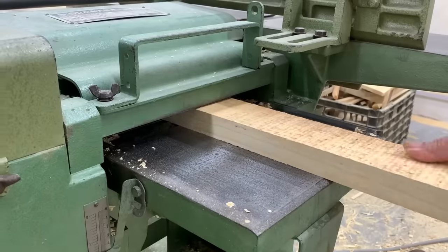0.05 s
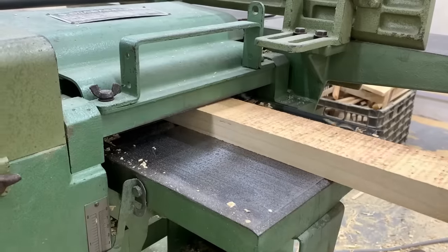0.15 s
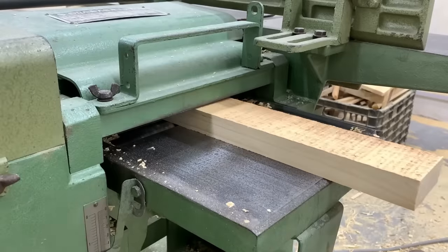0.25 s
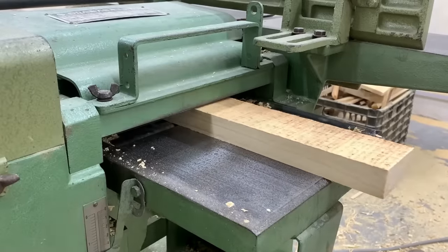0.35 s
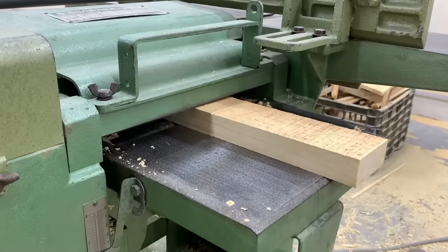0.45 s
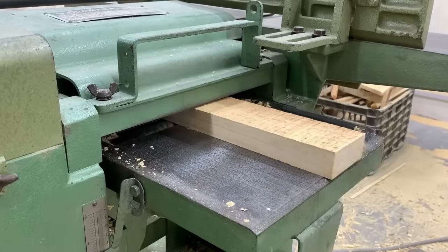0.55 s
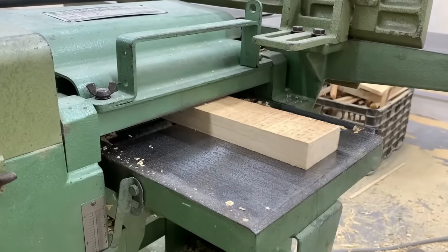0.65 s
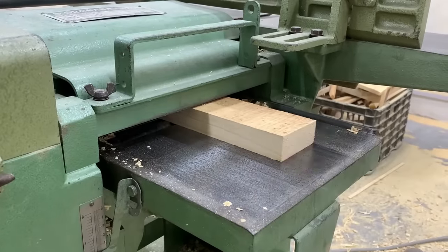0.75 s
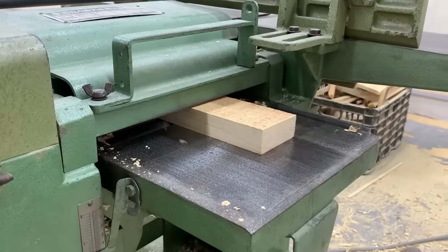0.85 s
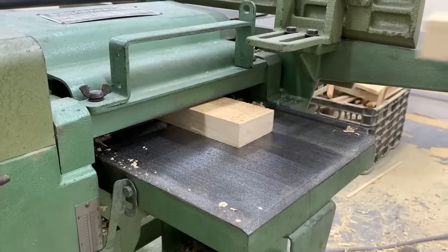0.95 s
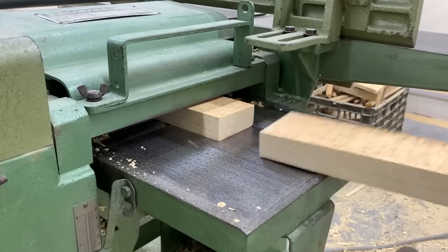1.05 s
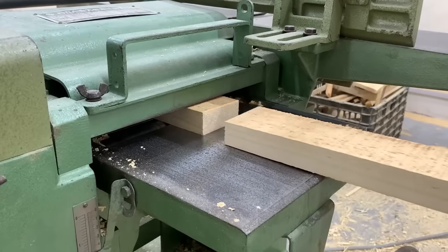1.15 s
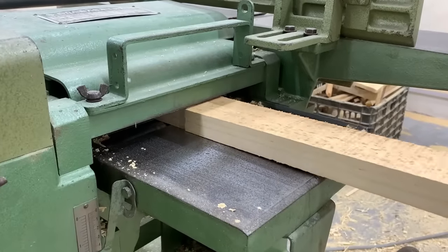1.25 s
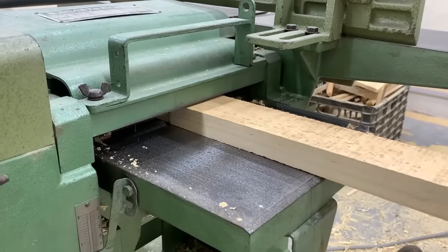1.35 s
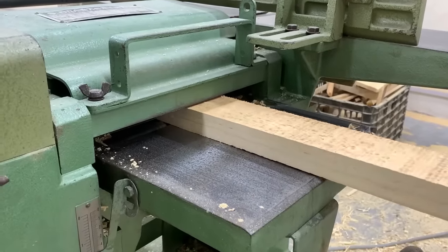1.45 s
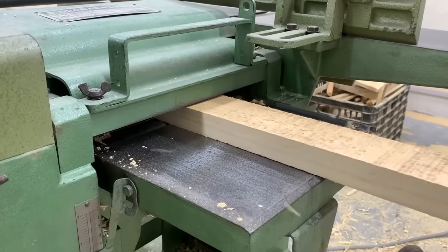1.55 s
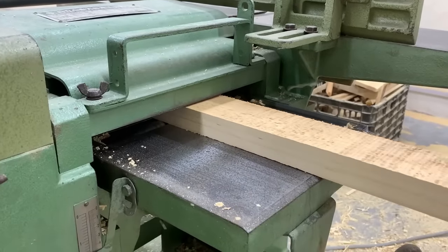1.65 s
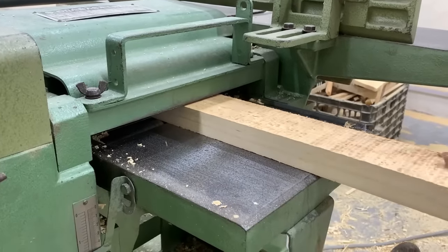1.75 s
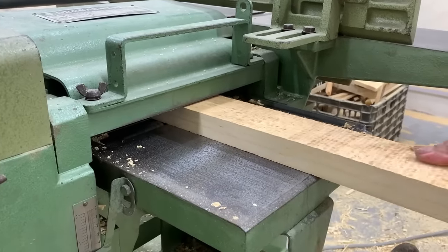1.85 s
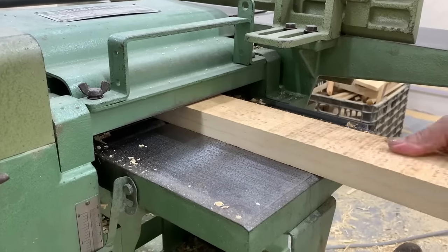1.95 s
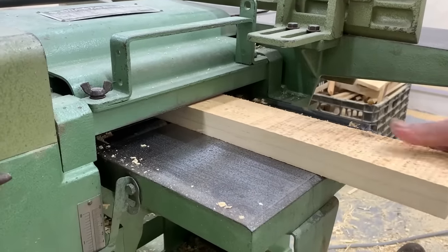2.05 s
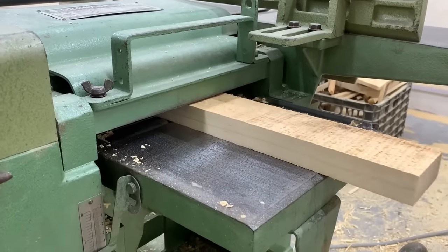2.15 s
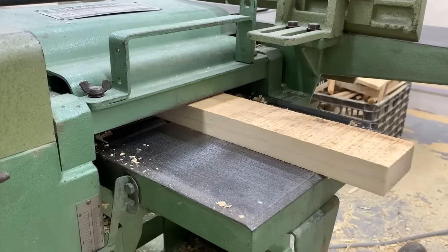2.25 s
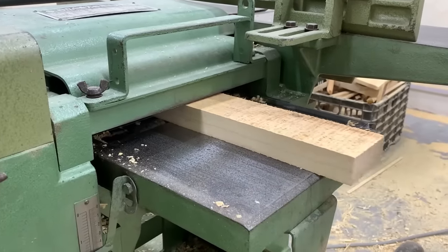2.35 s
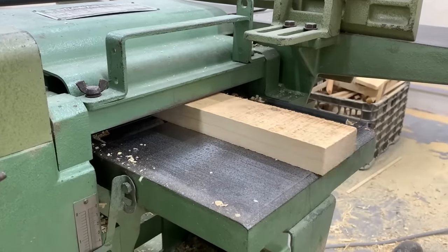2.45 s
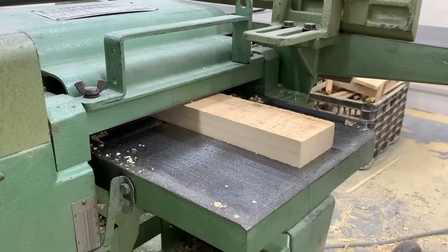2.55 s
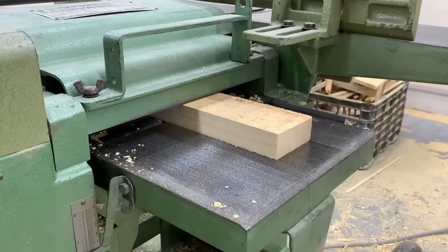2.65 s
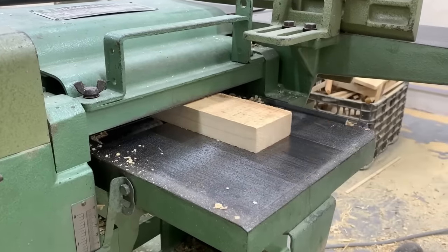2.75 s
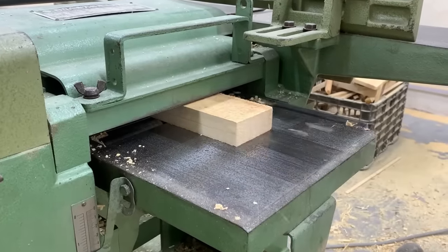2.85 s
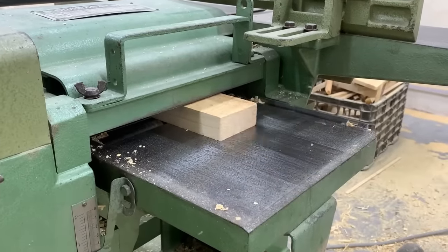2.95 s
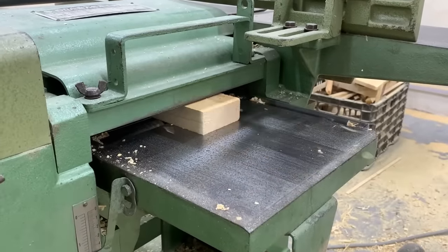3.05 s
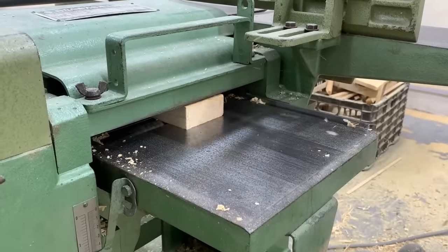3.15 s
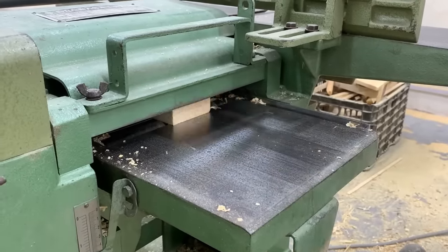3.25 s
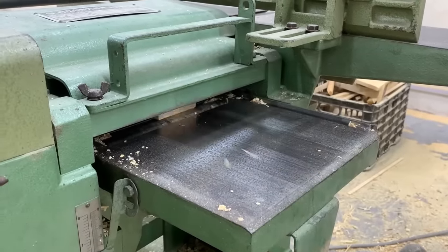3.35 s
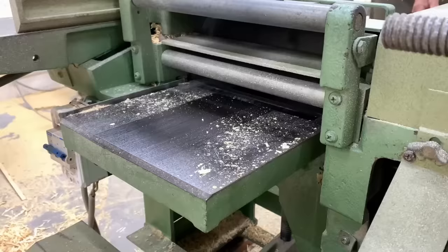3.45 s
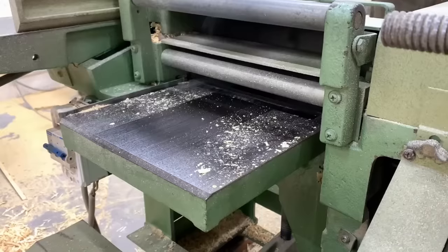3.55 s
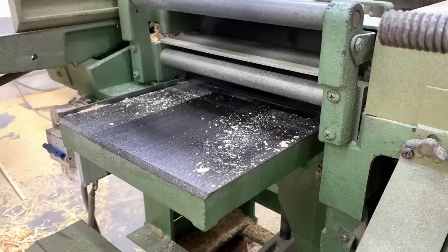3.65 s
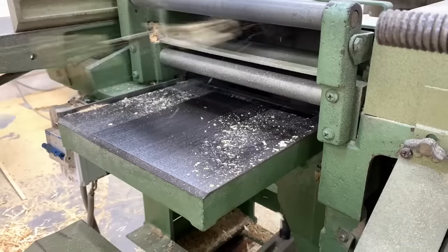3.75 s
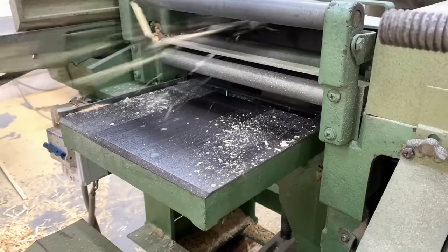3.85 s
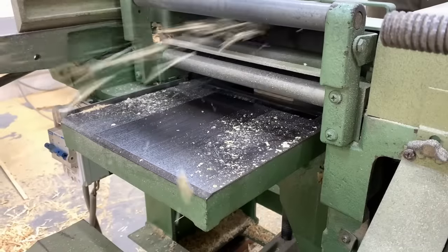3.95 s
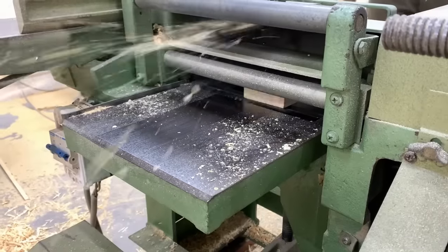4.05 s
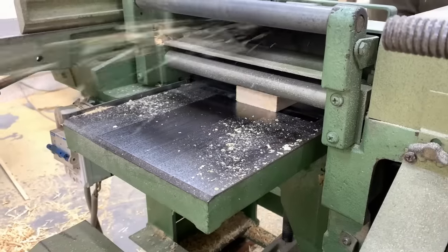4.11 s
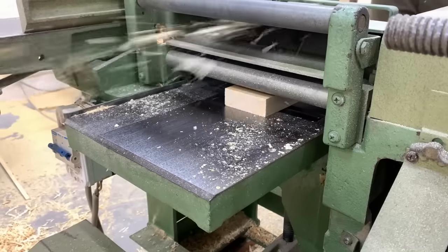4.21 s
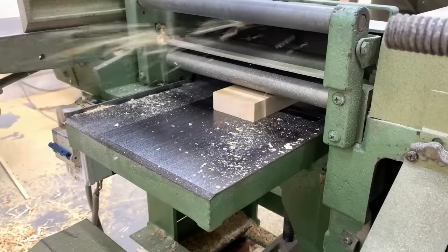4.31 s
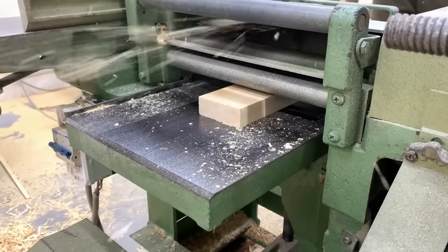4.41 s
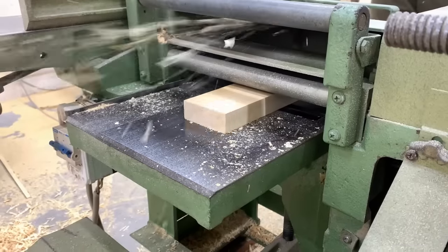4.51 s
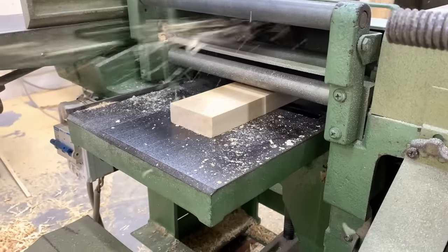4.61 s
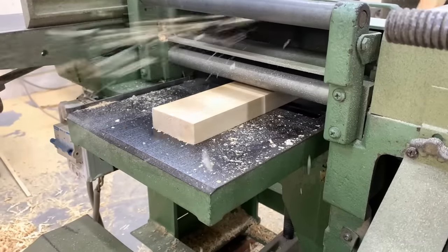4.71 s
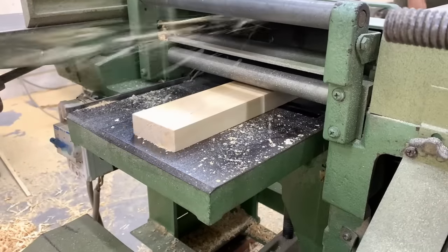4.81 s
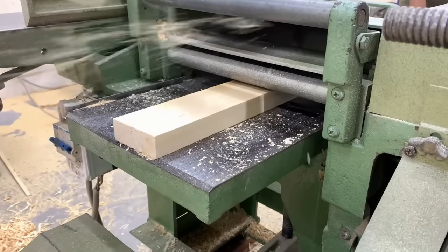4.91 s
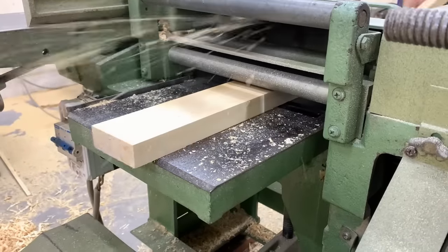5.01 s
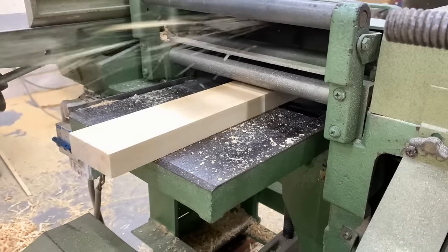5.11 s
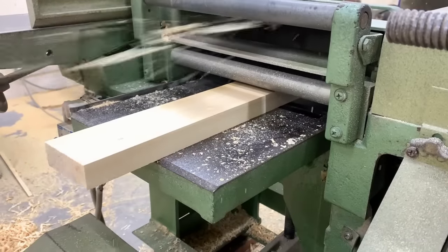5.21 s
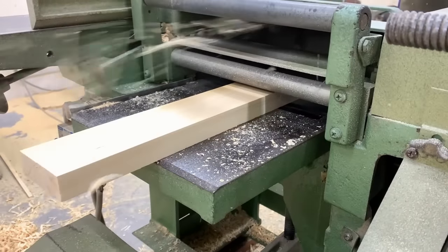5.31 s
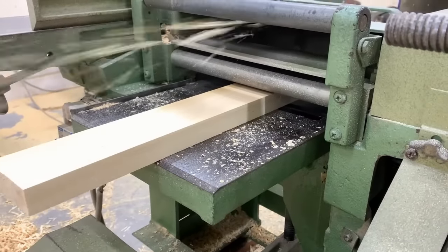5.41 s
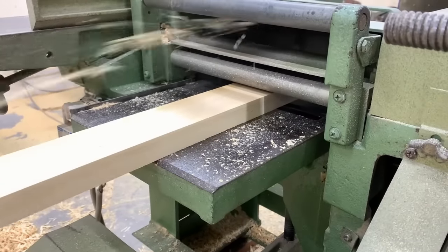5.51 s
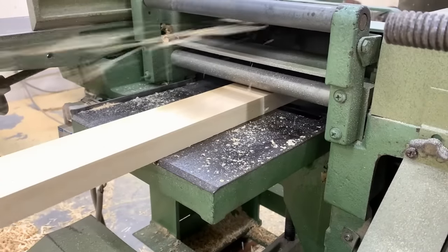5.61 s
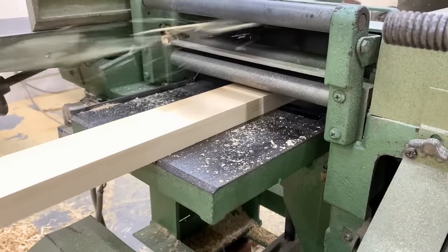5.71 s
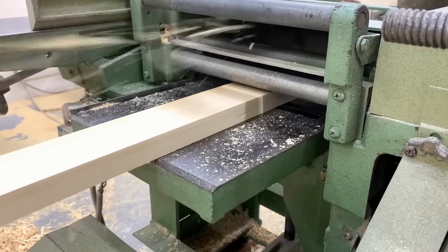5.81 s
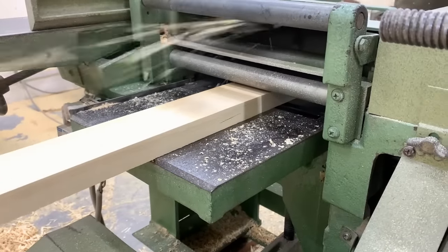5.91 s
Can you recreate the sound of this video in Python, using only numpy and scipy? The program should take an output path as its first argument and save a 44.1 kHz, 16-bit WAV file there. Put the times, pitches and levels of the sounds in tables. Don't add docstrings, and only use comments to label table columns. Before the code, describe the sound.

A thickness planer is already cutting at 0 s, heard close in stereo in a workshop: a steady buzzing howl around 256 Hz with a tall stack of piercing overtones, gear and roller whine, roaring air and torn-wood hiss. Squeals flicker at the start, and a ringing tone slides upward from 0.5 to 0.9 s. A sharp wooden knock lands at 0.7 s, clacks at about 1.2 s as another board comes in, then a bright squeal near 1.8-2.0 s and a duller knock at 2.4 s. Faint taps and a strong squeal come around 3.4-3.57 s. At 3.58 s a tiny gap switches to the outfeed: the machine runs free, slightly higher, airier and whinier. At 3.9 s the knives bite, pitch sags, and harsh ringing and rattling return. Flying chips make thin metallic pings, mainly 4.7-5.3 s. The cut continues until the abrupt end near 6 s.

```python
import sys
import numpy as np
from scipy import signal
from scipy.fft import rfft, irfft, next_fast_len
from scipy.io import wavfile
from scipy.ndimage import uniform_filter1d, map_coordinates

SR = 44100
rng = np.random.default_rng(int(sys.argv[2]) if len(sys.argv) > 2 else 0)


def undo_db(level):
    steps = np.asarray(level, float) / 20
    return 10 ** steps


def output_pcm(signal):
    pcm = np.clip(np.atleast_2d(signal).T, -1, 1) * 32767
    wavfile.write(sys.argv[1], SR, np.round(pcm).astype(np.int16))


N = 263277
T = np.arange(N) / SR
SLOW = T[::128]
CHANGE_START_S, CHANGE_END_S = 3.5748, 3.5915
AT_INFEED = T < (CHANGE_START_S + CHANGE_END_S) / 2
CUT_STARTS_S = 3.91
SQUEAL_PEAK_DB = 4


def unit(x):
    return x / np.sqrt(np.mean(np.abs(x) ** 2) + 1e-20)


def along(points, hz):
    f, v = np.transpose(points)
    return np.interp(np.log(hz + 1), np.log(f + 1), v)


def curves(rows, t):
    s, *cols = np.transpose(rows)
    return [np.interp(t, s, c) for c in cols]


def wobble(rate_hz, t):
    return map_coordinates(rng.standard_normal(400), [t * np.clip(rate_hz, 0, 60)])


def filtered(x, response):
    m = next_fast_len(N + 8192)
    gain = response(np.fft.rfftfreq(m, 1 / SR))
    return irfft(rfft(x, m) * gain, m)[..., :N]


def swell(start_s, end_s):
    outside_s = np.maximum(start_s + .06 - SLOW, SLOW - end_s + .04)
    return -30 * np.clip(outside_s / .13, 0, 1) * ((SLOW > .06) | (start_s > 0))


def place(infeed, idle, cutting):
    entering = np.clip((SLOW - CUT_STARTS_S) / 0.025 + .5, 0, 1)
    return np.where(SLOW < (CHANGE_START_S + CHANGE_END_S) / 2, infeed, idle + (cutting - idle) * entering)


def partial(turns, db, pan_db, lead_rad, fuzz, fuzz_rate):
    blur = 1 + fuzz * (wobble(fuzz_rate, SLOW) + 1j * wobble(fuzz_rate, SLOW))
    blur = blur / np.sqrt(1 + 2 * fuzz ** 2)
    ears = [blur * undo_db(ear * pan_db / 2) * np.exp(ear * 1j * lead_rad) for ear in (1, -1)]
    size = np.sqrt(2) * undo_db(db) * np.array(ears)
    size = np.repeat(size.astype(np.complex64), 128, axis=1)[:, :N]
    phase = (2 * np.pi * (turns % 1)).astype(np.float32)
    return size.real * np.cos(phase) - size.imag * np.sin(phase)


# multiple of knife rate, start in s, end in s, gain in dB.
SHIFTS = [(8, 1.35, 1.85, 5), (8, 3.0, 3.58, 4), (4, 1.3, 2.2, -3), (4.418, 2.6, 3.35, -5),
          (5, 5.35, 5.9, -6), (5.418, 5.7, 5.9, 5), (6, 2.4, 3.0, 4), (6, 3.4, 3.55, -10),
          (6.418, 4.45, 5.8, -10), (7, 0.3, 1.05, -3), (7, 1.75, 2.15, 4), (7.418, 3.05, 3.25, 5),
          (7.418, 4.9, 5.5, -6), (8, 0.05, 0.2, 7), (8, 0.4, 1.45, -3), (8, 3.9, 4.2, 4),
          (8, 5.4, 5.75, 5), (8.418, 0.0, 1.95, -4), (8.418, 2.6, 3.5, -4), (8.418, 4.65, 4.95, 4),
          (9, 0.25, 1.45, -9), (9.418, 3.95, 4.25, -10), (11, 2.25, 3.6, -3), (11, 4.65, 5.25, -5),
          (12, 1.4, 1.9, 7),
          (13, 2.1, 3.45, -5), (14, 0.0, 1.65, -6), (14, 2.55, 3.6, -4), (14, 3.85, 4.05, 10),
               (14, 4.8, 5.3, 6), (15, 1.4, 3.35, -3), (15, 5.05, 5.95, -4), (16, 1.1, 3.5, -4),
               (16, 4.1, 5.9, -5), (17, 0.0, 0.15, -4), (17, 0.95, 1.85, -7), (17, 3.55, 4.3, -6),
               (17, 5.05, 5.4, -6), (18, 1.35, 1.8, -5), (18, 3.6, 4.35, -5), (19, 1.15, 3.55, -4),
               (19, 4.6, 5.2, 8), (20, 0.0, 1.8, -3), (20, 1.9, 3.55, -5), (20, 4.3, 5.95, -5),
               (21, 0.0, 1.95, -4), (21, 2.1, 3.45, -8), (21, 3.55, 5.95, -6), (22, 3.55, 5.95, -4),
               (23, 0.85, 3.25, -4), (23, 3.85, 5.95, -4), (24, 2.75, 3.5, -10), (25, 4.3, 5.95, -6),
               (26, 5.6, 5.9, -10), (27, 0.35, 0.55, -9), (27, 0.9, 1.8, -4), (27, 4.8, 5.4, -7),
               (28, 0.4, 0.55, -10), (28, 3.7, 5.35, -5), (29, 0.4, 1.45, -3), (30, 0.5, 0.9, -9),
               (31, 0.3, 2.1, -4), (32, 0.5, 0.85, -6), (33, 0.8, 1.7, -5), (34, 3.6, 4.35, -3),
               (35, 0.2, 0.95, -4), (36, 2.4, 3.0, 10), (36, 3.55, 5.8, -5), (37, 0.2, 0.55, -10),
          (12, 1.65, 1.8, 8), (12, 3.25, 3.55, 9), (12, 3.8, 3.95, 9), (13, 2.7, 2.9, 7),
                (14, 4.7, 5.15, -4), (15, 0.2, 0.65, 6), (15, 2.55, 3.1, -4), (17, 0.15, 0.65, -6),
                (17, 2.9, 3.45, -4), (18, 4.85, 5.0, 8), (19, 4.75, 4.9, 9), (20, 1.7, 1.85, -7),
                (21, 0.95, 1.5, -8), (22, 3.55, 3.9, -9), (23, 0.55, 0.8, -8), (23, 3.3, 3.55, -9),
                (23, 4.2, 4.75, -5), (24, 1.95, 2.15, 7), (24, 3.95, 4.5, -9), (25, 0.0, 0.25, -7),
                (26, 1.95, 2.2, 9), (26, 5.35, 5.55, 6), (27, 0.65, 0.9, 5), (29, 5.05, 5.3, 7),
                (30, 4.4, 4.7, 5), (30, 4.95, 5.5, 6), (32, 4.5, 4.95, 5), (34, 4.35, 4.65, 5),
                (36, 1.9, 2.45, 9), (36, 2.5, 3.05, 7), (40, 3.1, 3.5, 8), (43, 5.7, 5.9, 9)]


def shift(k):
    total_db = 0
    for tone, start, end, db in SHIFTS:
        if tone == k:
            total_db = total_db + db * np.clip(1 + swell(start, end) / 30, 0, 1)
    return 0.8 * total_db


def tones(table, turns, fuzz, fuzz_rate):
    out = np.zeros((2, N))
    for k, infeed, idle, cutting, pan_in, pan_out in table:
        db = place(infeed, idle, cutting) + shift(k) + 0.5
        pan_db = place(pan_in, pan_out, pan_out)
        out += partial(k * turns + rng.random(), db, pan_db, rng.normal(-0.19, 0.13), fuzz, fuzz_rate)
    return out


# time in s, knife passes per s.
SPEED = [(0.0, 256.5), (0.55, 256.85), (1.22, 257.7), (1.62, 257.35), (1.9, 256.75), (2.15, 256.95),
         (2.65, 256.9), (3.2, 256.0), (3.4, 255.95), (3.58, 256.2), (3.59, 259.4), (3.86, 259.4),
         (3.95, 256.1), (4.05, 255.8), (4.4, 255.5), (4.8, 255.45), (5.05, 255.72), (5.97, 255.75)]


def knife_turns():
    return np.cumsum(curves(SPEED, T)[0]) / SR


# frequency in Hz, infeed dB, outfeed idle dB, outfeed cutting dB.
GRAIN = [(3540, -35.5, -46, -29), (4500, -33.5, -49, -36), (6200, -48.5, -49, -46), (7900, -50, -45, -34.5),
         (10000, -49, -54, -53), (10600, -33.5, -50, -42), (13500, -48, -52, -36)]
# start in s, end in s, centre from Hz, to Hz, level in dB.
CHATTER = [(0, .1, 4900, 4600, -25), (.2, .5, 6580, 7600, -32.5), (.6, 1.0, 5860, 6900, -29.5),
           (1.02, 1.4, 7360, 6400, -36), (1.6, 1.75, 6200, 5700, -38), (1.82, 1.98, 5300, 3700, -25),
           (3.0, 3.3, 4100, 4500, -34), (3.08, 3.3, 9000, 11700, -37), (3.38, 3.58, 4350, 4500, -32.5),
           (3.92, 4.45, 4500, 4500, -32), (5.7, 5.9, 4930, 6800, -33.5)]
# start in s, end in s, centre from Hz, to Hz, level in dB.
FREE_END = [
    (.52, .9, 7100, 9100, -29),
    (.9, 1.12, 9300, 8530, -38),
    (3.9, 4.17, 8950, 8600, -30.5),
]


def bite(hz):
    grip_s, let_go_s = 0.04, 0.072
    f, *levels = np.transpose(GRAIN)
    power = undo_db(2 * place(*[np.interp(hz, f, level) for level in levels]))
    for rows, width_octaves in [(CHATTER, 0.43), (FREE_END, 0.13)]:
        for start, end, from_hz, to_hz, db in rows:
            edge = np.maximum(np.maximum((start - SLOW) / grip_s, (SLOW - end) / let_go_s), 0)
            centre_hz = np.interp(SLOW, [start, end], [from_hz, to_hz])
            off = np.log2(hz / centre_hz) / width_octaves
            power = power + undo_db(2 * (db - 20 * edge)) * np.exp(-off ** 2)
    return 10 * np.log10(power)


BITE_HZ = [4530, 6100, 9000]


def whole_bite():
    power = sum(undo_db(2 * bite(hz)) for hz in BITE_HZ)
    return np.interp(T, SLOW, 10 * np.log10(power))


# frequency in Hz, correlation (0 to 1).
ALIKE = [(150, 0.4), (350, 0.75), (1200, 0.76), (2500, 0.68), (3300, 0.46), (8000, 0.12), (14000, 0.059)]
# frequency in Hz, L-R in dB.
LEAN = [(150, -7.5), (400, -3), (1000, -2.5), (3000, -0.5), (8000, -1.5), (14000, -2.5)]


def rush(spectrum, hood, patchy_db):
    z = signal.stft(rng.standard_normal((2, N)), nperseg=512)[2]
    field = uniform_filter1d(rng.standard_normal(z.shape[1:]), size=5, axis=0)
    field = uniform_filter1d(field, size=12, axis=1)
    pair = signal.istft(z * undo_db(patchy_db * unit(field)), nperseg=512)[1][:, :N]

    def colour(hz):
        ring_db = sum(db / (1 + (2 * (hz - centre) / width) ** 2) for centre, width, db in hood)
        angle = np.arccos(np.clip(along(ALIKE, hz), -1, 1)) / 2
        return undo_db(along(spectrum, hz) + ring_db) * [np.cos(angle), np.sin(angle)]

    mid, side = filtered(pair, colour)
    ears = np.array([mid + side, mid - side])
    return unit(filtered(ears, lambda hz: undo_db([[.5], [-.5]] * along(LEAN, hz))))


# frequency in Hz, infeed dB, outfeed idle dB, outfeed cutting dB,
# infeed L-R in dB, outfeed L-R in dB.
FEED = [(290, -56, -49, -52, -5, -3), (328, -63, -65, -67, -5, -4), (447, -61, -61, -61, -4, -2),
        (657, -58, -57, -59, -8, -4), (840, -49, -61, -53, -2, -3), (3968, -57, -52, -50, 0, -1)]


def feed_motor():
    return tones(FEED[:5], T, fuzz=0.14, fuzz_rate=15) + tones(FEED[5:], T, fuzz=.6, fuzz_rate=18)


# frequency in Hz, density in dB per Hz.
ROAR_IN = [(60, -52), (100, -40), (150, -20), (400, -15.5), (700, -13), (1000, -5.5), (1500, -6),
           (2150, -1), (3000, -3), (4500, -9), (6500, -12), (9300, -15), (12000, -42)]
# frequency in Hz, density in dB per Hz.
ROAR_OUT = [(60, -55), (100, -62), (150, -28), (220, -23), (700, -14), (1000, -11.5), (1500, -7),
            (2150, -3), (3000, -6.5), (4500, -6.5), (6500, -13), (9300, -16.5), (12000, -50)]
# frequency in Hz, width in Hz, dB over the roar.
HOOD_IN = [(1120, 43, 6), (1393, 30, 7), (1610, 40, -3), (1930, 103, 6), (2168, 49, 11)]
# frequency in Hz, width in Hz, dB over the roar.
HOOD_OUT = [(1082, 92, 6.3), (1317, 200, 6.9), (1965, 24, 5), (2172, 138, 10.4), (2480, 58, 6.4),
            (3690, 34, 6.7), (4400, 51, 3.4), (5926, 100, 11.6)]
# frequency in Hz, density in dB per Hz.
HISS_IN = [(3000, -30), (7000, -24), (10200, -2), (13000, 0), (14500, -4), (16000, -10)]
# frequency in Hz, density in dB per Hz.
HISS_OUT = [(3000, -33), (7000, -12), (10200, -1), (13300, 0), (14500, -5), (16000, -7.5)]


def air(turns):
    emptying_s, emptying_db = 3.3, 1
    emptying = np.clip((T - emptying_s) / (CHANGE_START_S - emptying_s), 0, 1) * (T < CHANGE_END_S)
    roar_db = np.interp(T, SLOW, place(-27, -20.5, -22)) + emptying_db * emptying
    hiss_db = np.interp(T, SLOW, place(-45, -38.5, -40)) + emptying_db * emptying
    hiss_db = hiss_db + 0.19 * (whole_bite() + 30)
    roar = np.where(AT_INFEED, rush(ROAR_IN, HOOD_IN, patchy_db=1.5), rush(ROAR_OUT, HOOD_OUT, patchy_db=2.0))
    hiss = np.where(AT_INFEED, rush(HISS_IN, [], patchy_db=-2.2), rush(HISS_OUT, [], patchy_db=1.0))
    puff = unit(1 + 0.19 * np.cos(2 * np.pi * turns))
    surge_db = 0.43 * wobble(9, T) + .5 * wobble(24.91, T)
    return undo_db(roar_db + surge_db + 0.67) * roar + undo_db(hiss_db + 5.0 + .5 * surge_db) * puff * hiss


def aside(x):
    late = np.roll(x, 2, axis=1)
    return np.where(AT_INFEED, [x[0], late[1]], [late[0], x[1]])


# frequency in Hz, level in dB, lift in dB when a big chip hits.
PLATES = [(3790, -47, 5), (3970, -49, 13), (5900, -48, 0)]
CHIP_HITS = [3.89, 4.66, 4.81, 4.9, 5.065, 5.17, 5.27, 5.96]


def plates():
    half_ring_s, flicker_db = .022, 3.5
    hits = sum(np.exp(-((SLOW - s) / half_ring_s) ** 2) for s in CHIP_HITS)
    out = np.zeros((2, N))
    for hz, db, lift_db in PLATES:
        flicker = flicker_db * (1 - hits) * wobble(14, SLOW)
        level_db = db + place(-60, 0, 0) + lift_db * hits + flicker
        out += partial(hz * T, level_db, -1, .22, fuzz=.77 - lift_db / 30, fuzz_rate=45)
    return out


# multiple of knife rate, start in s, end in s, level in dB.
WHISTLES = [
    (12.418, .0, 3.6, -50),
    (11.418, 4.4, 5, -45),
    (12.418, 3.9, 5.97, -48),
]


def whistles(turns):
    out = np.zeros((2, N))
    for k, start, end, db in WHISTLES:
        level_db = db + SQUEAL_PEAK_DB + swell(start, end)
        out += partial(k * turns, level_db, -1.3, 0.59, fuzz=0.27, fuzz_rate=12)
    return out


# multiple of knife rate, infeed dB, outfeed idle dB,
# outfeed cutting dB, infeed L-R in dB, outfeed L-R in dB.
GEAR = [(3.418, -55, -44, -52, -2, -3), (4.418, -47, -38, -46, 0, 0), (5.418, -46, -44, -40, 3, -4),
        (6.418, -44, -48, -54, 0, -5), (7.418, -36, -39, -45, 1, -8), (8.418, -39, -30, -32, 2, -2),
        (9.418, -54, -37, -43, -1, -4)]


def gears(turns):
    clean = tones(GEAR[:5] + GEAR[6:], turns, fuzz=0.15, fuzz_rate=16)
    return clean + tones(GEAR[5:6], turns, fuzz=.6, fuzz_rate=24)


# time in s, frequency in Hz, level in dB.
ROLLERS = [(0, 1126, -47), (.85, 1124, -47), (1.0, 1117, -43), (1.95, 1114, -41), (2.15, 1108, -40),
           (2.65, 1102.5, -41), (2.9, 1105, -39), (3.05, 1101, -42), (3.2, 1094, -47), (3.56, 1088, -48),
           (3.6, 1131, -35), (4.1, 1125, -35), (4.35, 1112, -39), (4.5, 1105, -42), (4.8, 1110, -40),
           (5.3, 1109, -43), (5.6, 1104, -39), (5.97, 1096, -39)]
# time in s, level in dB.
SIDEBAND = [(0, -47), (1.2, -43), (2.0, -43), (2.3, -50), (3.56, -53), (3.6, -43), (4.3, -49)]
# overtone, level in dB.
ROLLER_TOP = [(3, -48), (4, -49), (5, -50), (6, -53), (7, -56), (8, -56)]
# overtone, start in s, end in s, level in dB.
ROLLER_BLOOMS = [(2, 2.45, 3.62, -36), (2, 3.58, 4.4, -37), (2, 5.6, 6.1, -35), (3, 1.95, 2.4, -45),
                 (3, 2.97, 3.32, -37), (3, 3.52, 4.0, -35), (3, 4.0, 4.35, -42), (3, 4.75, 5.0, -40),
                 (3, 5.55, 6.1, -39), (4, .75, .92, -44), (4, 1.35, 2.0, -48), (4, 3.0, 3.17, -44),
                 (4, 3.6, 4.0, -48), (4, 4.03, 4.23, -39), (4, 5.6, 5.82, -41), (5, 2.1, 2.8, -48),
                 (5, 3.15, 3.5, -42), (5, 3.72, 4.05, -40), (5, 5.1, 6.1, -47), (6, 3.6, 6.1, -52),
                 (7, 3.62, 3.98, -47), (8, 3.65, 4.2, -48), (8, 5.55, 5.85, -49)]


def rollers():
    turns = np.cumsum(curves(ROLLERS, T)[0]) / SR
    hz, db = curves(ROLLERS, SLOW)
    out = partial(turns, db, -6.0, -0.048, fuzz=0.25, fuzz_rate=14)
    out += partial(turns + FEED[0][0] * T, curves(SIDEBAND, SLOW)[0], -5, 0, fuzz=.2, fuzz_rate=8)
    octave_db = db + 0.2956 * (1130 - hz) - 5
    for k, base_db in [(2, octave_db)] + ROLLER_TOP:
        levels = [base_db + 0 * SLOW]
        for tone, start, end, bloom_db in ROLLER_BLOOMS:
            if tone == k:
                levels.append(bloom_db + SQUEAL_PEAK_DB + swell(start, end))
        out += partial(k * turns, np.max(levels, axis=0), -1.5, -0.35, fuzz=0.25, fuzz_rate=17)
    return out


# time in s, peak in dB, L-R in
# dB, bounce after s, bounce in dB.
KNOCKS = [(.7023, -6.5, -1.5, 0.0049, -11), (1.172, -11, -2, 0.0013, -2), (2.3683, -13, -1.5, 0.0038, 0),
          (1.1975, -17, -2, .008, -2.5), (3.5738, -34, -1, .001, -2.5), (3.461, -22, -1, .002, -2.5),
          (3.515, -21, -1, .002, -2.5), (3.547, -21, -1, .002, -2.5), (.751, -15.5, -1, 0.021, -3),
          (2.379, -21, -1.5, .006, 2), (.712, -21, -1.5, .011, -2)]
# frequency in Hz, level in dB, t60 in s.
RINGS = [
    [(1790, 1, 0.017), (3680, -4, 0.016), (4700, -4, 0.023), (6670, 3.5, 0.016), (8900, -13, .025)],
    [(5930, -4, 0.0089), (7550, -1, 0.022), (8380, 9.5, 0.012), (11300, -8, .008)],
    [(1626, 1, 0.092), (5330, 0, 0.014), (6400, -1, 0.015), (8200, -2, 0.009), (11300, -16, .01)],
    [(4140, 1, 0.035), (8380, -1, 0.013)],
    [(8000, 0, .01)],
]


def knocks():
    out, t = np.zeros((2, N + SR)), np.arange(SR // 4) / SR
    band = signal.butter(4, [.12, .45], "band", output="sos")
    for (s, db, pan_db, bounce_s, bounce_db), modes in zip(KNOCKS, RINGS):
        for late_s, soft_db in [(0, -7), (bounce_s, bounce_db - 5)]:
            ring = 0
            for hz, mode_db, t60 in modes:
                cycles = hz * t + rng.normal(0, 0.077, (2, 1))
                ring = ring + undo_db(mode_db - 60 * t / t60) * np.sin(2 * np.pi * cycles)
            noise = signal.sosfilt(band, rng.standard_normal((2, len(t))))
            crack = 1.46 * undo_db(-60 * t / 0.037) * noise
            blow = undo_db(db + soft_db) * (ring + crack) * (1 - np.exp(-t / 0.00047))
            out[:, round((s + late_s) * SR):][:, :len(t)] += blow * undo_db([[pan_db / 2], [-pan_db / 2]])
    low_hz = 400
    return filtered(out[:, :N], lambda hz: 1 / (1 + (low_hz / (hz + 1)) ** 4))


# frequency in Hz, density in dB per Hz.
CHIPS = [(3000, -42), (4200, 0), (7000, 0), (9300, -3), (10500, -28), (15000, -28)]


def chips(turns):
    burst = unit(np.exp(.9 * np.cos(2 * np.pi * turns)))
    return undo_db(whole_bite() - 15) * burst * rush(CHIPS, [], patchy_db=2.5)


# time in s, spacing of the board's modes in Hz.
OVERHANG = [(0, 1150), (.1, 1000), (.45, 1200), (.55, 1130), (1.15, 1520), (1.7, 1700), (1.82, 1285),
            (3.5, 1200), (3.9, 1500), (5.97, 1300)]
# overtone, start in s, end in s, level in dB.
SQUEALS = [(16, 0.0, 0.12, -37), (20, 0.0, 0.12, -34), (15, 0.0, 0.13, -36), (36, 0.3, 0.6, -48),
           (32, 0.2, 0.45, -44), (28, 0.8, 1.0, -40), (32, 0.95, 1.1, -43), (25, 1.05, 1.75, -44),
           (17, 4.15, 5.97, -49), (18, 1.25, 1.5, -45), (34, 1.25, 1.6, -48), (20, 1.78, 2.06, -31.5),
           (28, 1.79, 1.92, -40), (25, 1.86, 2.02, -39), (13, 1.95, 2.25, -40), (36, 3.1, 3.45, -49),
           (18, 2.3, 3.05, -47), (15, 2.9, 3.45, -42), (13, 2.85, 3.55, -43), (34, 3.05, 3.45, -46),
           (17, 3.36, 3.57, -31.5), (34, 3.95, 4.2, -43), (13, 3.92, 4.3, -42), (22, 0.0, 0.08, -40),
           (52, 3.95, 5.97, -52), (31, 4.9, 5.65, -47)]


def board(turns):
    spacing_hz, speed_hz = curves(OVERHANG, SLOW)[0], curves(SPEED, SLOW)[0]
    out = np.zeros((2, N))
    for k in range(13, 62):
        hz = k * 256
        db = bite(hz) - 11.5
        db = db - 8 * np.clip((hz - 9400) / 900, 0, 1)
        db = db + 2.5 * np.cos(2 * np.pi * k * speed_hz / spacing_hz) + .9 * wobble(9, SLOW)
        for overtone, start, end, squeal_db in SQUEALS:
            if round(overtone) == k:
                db = np.maximum(db, squeal_db + SQUEAL_PEAK_DB + swell(start, end))
        pan_db = along(LEAN, hz) + 3 * wobble(1.68, SLOW)
        lead_rad = 0.66 * np.sign(rng.normal()) + 0.12 * wobble(1.25, SLOW)
        out += partial(k * turns + rng.normal(0, .13), db + shift(k), pan_db, lead_rad, fuzz=.17, fuzz_rate=22)
    return out


# overtone, infeed dB, outfeed idle dB, outfeed cutting dB,
# infeed L-R in dB, outfeed L-R in dB.
KNIFE = [(1.0, -43, -40, -44, -7, 1), (2.0, -38, -40, -50, -4, -4), (3.0, -52, -45, -52, -4, -3),
         (4.0, -36, -34, -40, -3, 3), (5.0, -55, -43, -46, 0, 1), (6.0, -42, -42, -32, -1, -3),
         (7.0, -36, -62, -39, 1, -9), (8.0, -39, -28, -35, -1, 2), (9.0, -47, -49, -46, -5, -1),
         (10.0, -46, -44, -47, 1, -1), (11.0, -43, -57, -43, -2, -1), (12.0, -51, -45, -47, 5, -5)]


def knives(turns):
    return tones(KNIFE, turns, fuzz=0.17, fuzz_rate=7)


def scene():
    turns = knife_turns()
    mix = feed_motor() + aside(air(turns)) + plates() + whistles(turns) + gears(turns)
    mix = mix + rollers() + knocks() + chips(turns) + board(turns) + knives(turns)
    turned_db = np.where(AT_INFEED, .3, -.3) * [[.5], [-.5]]
    return undo_db(turned_db) * mix


def top_cut(x):
    return signal.sosfilt(signal.butter(12, 17090, fs=SR, output="sos"), x)


# time in s, level in dB.
TICKS = [
    (0, -38),
    (3.5924, -43),
    (3.688, -35),
    (5.968, -42),
]


def record(dry):
    mic_hz, top_hz = 70, 15750
    edge_s = np.maximum(CHANGE_START_S - T, T - CHANGE_END_S)
    x = filtered(dry, lambda hz: 1 / (1 + (mic_hz / (hz + 1)) ** 4))
    x = x * undo_db(-22 * np.clip(.5 - edge_s / 0.00056, 0, 1))
    for s, db in TICKS:
        x = x + undo_db(db) * np.exp(-((T - s) / 0.00087) ** 2)
    return top_cut(filtered(x, lambda hz: hz < top_hz))


dry = scene()
out = record(dry)
output_pcm(out)
```